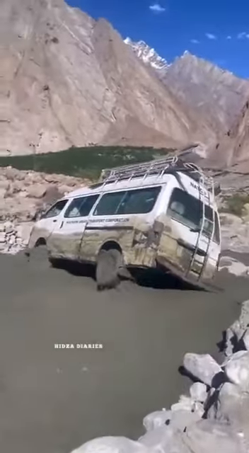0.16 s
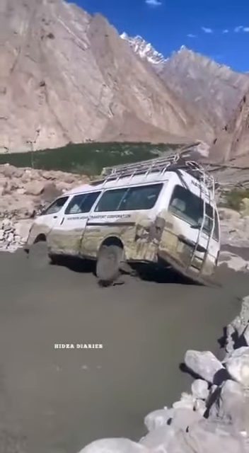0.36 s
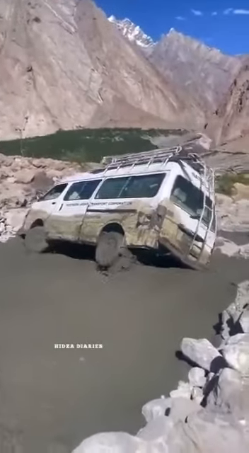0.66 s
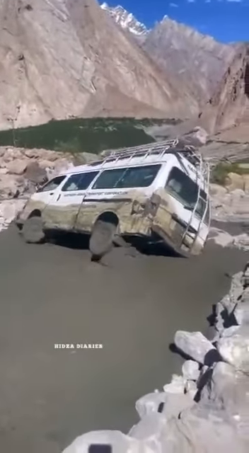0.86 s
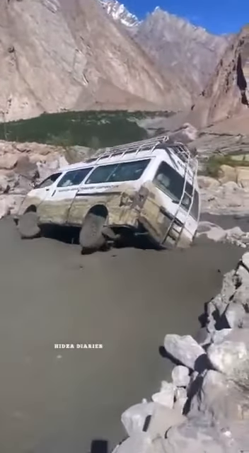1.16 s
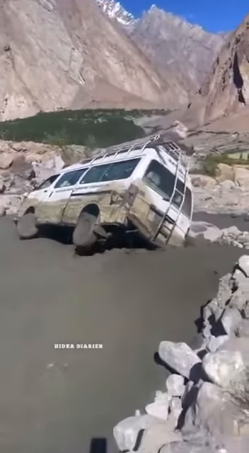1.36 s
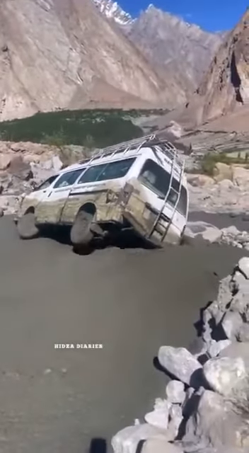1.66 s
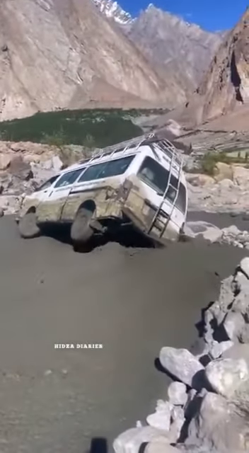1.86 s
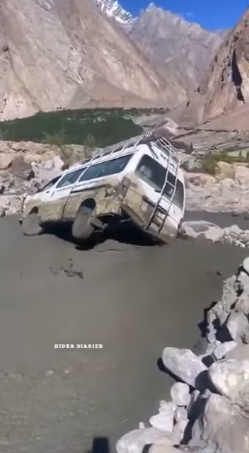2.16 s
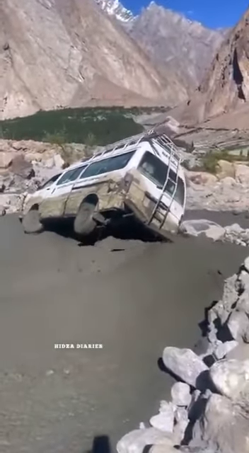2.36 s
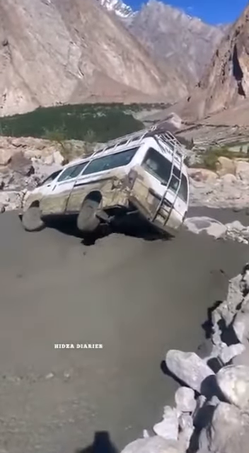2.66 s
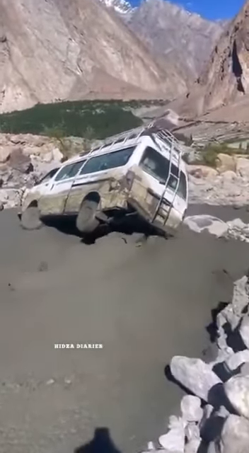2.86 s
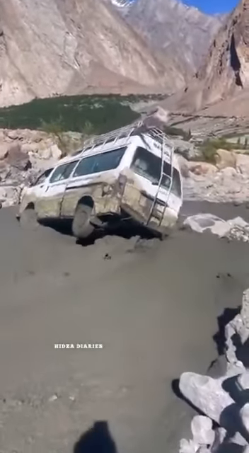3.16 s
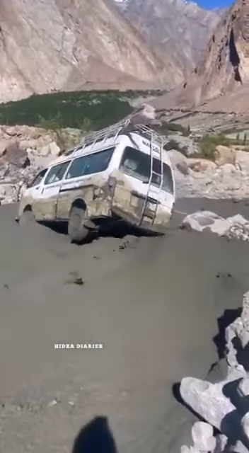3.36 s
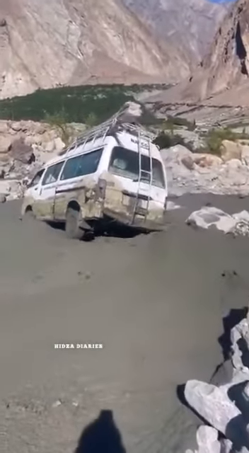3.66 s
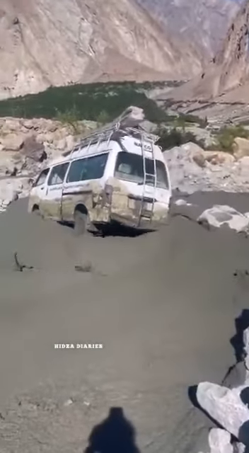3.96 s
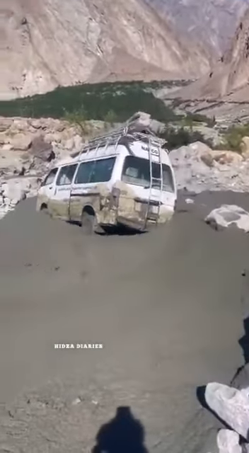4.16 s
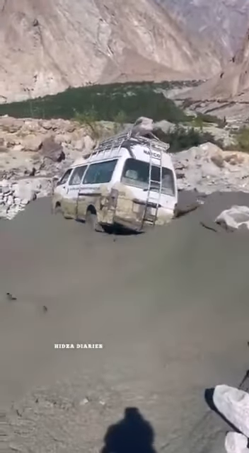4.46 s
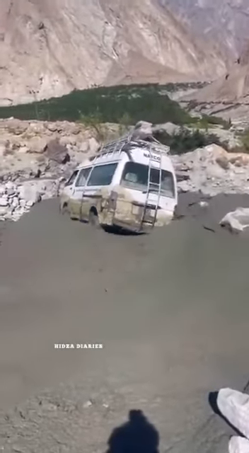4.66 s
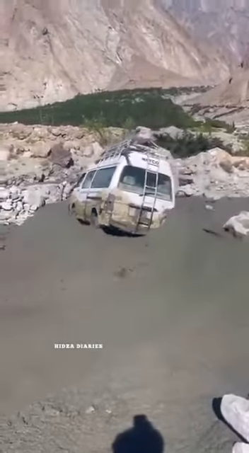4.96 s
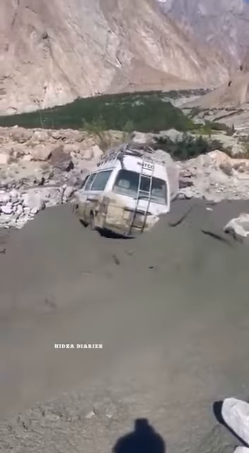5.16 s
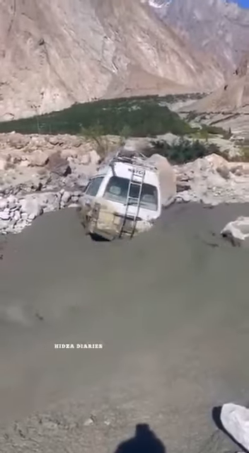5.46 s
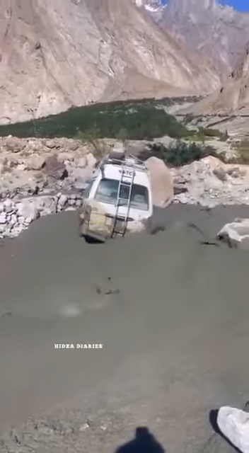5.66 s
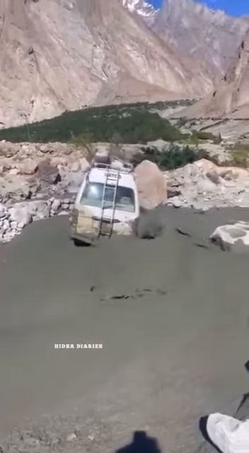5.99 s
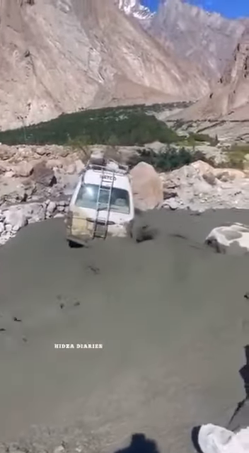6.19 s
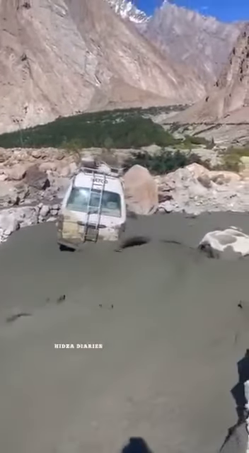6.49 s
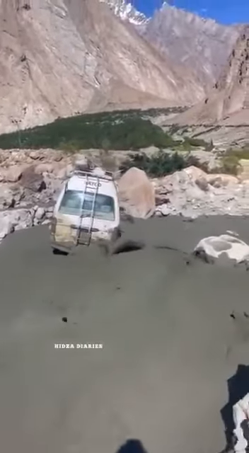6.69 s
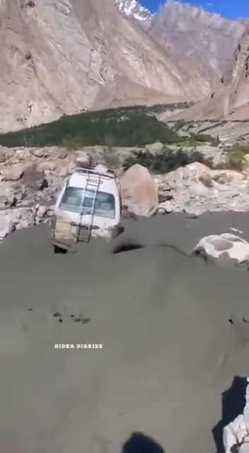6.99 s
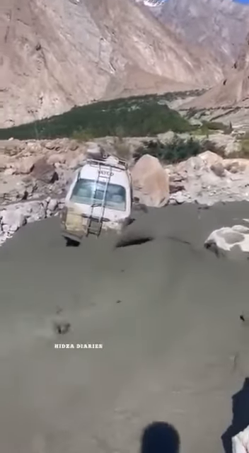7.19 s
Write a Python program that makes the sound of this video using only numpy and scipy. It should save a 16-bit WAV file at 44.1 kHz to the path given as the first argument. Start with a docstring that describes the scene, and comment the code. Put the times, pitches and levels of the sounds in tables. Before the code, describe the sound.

A thick flood of mud slides past a stony bank in an open mountain valley, heard from a handheld stereo microphone. Throughout there is a steady gritty rush, mostly midrange, with fizzing spray, small droplet rings and dull stones rolling in a hollow churn. The churn starts strong; around 0.3 seconds a sharp wet splatter comes with stone knocks and a cluster of wind thumps, and the surface hiss surges to about 0.7, then eases by 1 to 2. At 2.4 to 2.5 a dense, hard crack of gravel and stones bursts close by. A smaller splat follows near 3.4, a dull plop near 4.0. Wind flutters strongly against the microphone from 4.1 to 4.65. Soft slops fold over, clearest around 6.0 and 7.1, with a short tick near 6.55. The flow is still running, its churn slightly fuller, at about 7.3.

```python
"""A stony bank in a mountain valley: a thick mudflow slides past, heard through two microphone ports.
The mud rushes and fizzes as band-split noise with fine grit, and droplets ring as short resonances.
Rolling stones are lumpy dull noise that rings a hollow; single knocks are damped tones inside the mud.
Slops are swells of filtered noise; splatters, a load of gravel cracking down close by, and a few short
plops, bubbles and ticks are bursts. Wind buffets the ports as low noise and thuds a few cycles long."""
import sys
import numpy as np
from scipy import signal
from scipy.fft import rfft, irfft, next_fast_len
from scipy.io import wavfile
from scipy.ndimage import uniform_filter1d

SR = 44100
rng = np.random.default_rng(int(sys.argv[2]) if len(sys.argv) > 2 else 0)


def master_out(mix):
    """Clip the mix to full scale and print it as 16-bit PCM to the path in sys.argv[1]."""
    frames = np.transpose(np.atleast_2d(mix))
    ceiling = np.clip(frames, -1, 1)
    pcm = np.round(ceiling * 32767).astype(np.int16)
    wavfile.write(sys.argv[1], SR, pcm)


N = 323253

# strength of the mudflow: (time [s], surface rush level [dB], churning body level [dB])
FLOW_LEVELS = [(0.0, -41, -25.5), (0.18, -41, -31.5), (0.28, -41.5, -32.5), (0.35, -39, -28.5),
               (0.49, -36, -31), (0.67, -32.5, -31.5), (1.12, -39.5, -35.5), (2.28, -40.5, -41),
               (2.38, -42, -39.5), (2.6, -39.5, -42), (2.88, -37, -35.5), (3.29, -39, -37),
               (3.55, -38, -39.5), (3.66, -42, -39), (3.72, -37, -43), (3.92, -36, -39.5), (4.2, -39, -38),
               (4.41, -39, -35.5), (4.76, -40.5, -40), (5.35, -41, -40), (6.37, -41, -38.5),
               (6.51, -39, -34.5), (6.84, -39.5, -36.5), (7.33, -39, -33.5)]
# relative spectrum of splats and slops: (frequency [Hz], gain [dB])
SPLAT_SPECTRUM = [(410, -6.5), (700, 0), (1070, -1.5), (1630, -8), (3640, -6), (5600, -8), (7800, 1.5),
                  (9500, -6), (11500, -17), (15600, -34)]


def amp(db):
    """Decibels to gain."""
    return 10 ** (np.asarray(db) / 20)


def rms_one(x):
    """Scale to unit rms."""
    return x / np.sqrt(np.mean(x ** 2) + 1e-20)


def in_time(rows):
    """Columns of a curve table at every sample."""
    s, *columns = np.transpose(rows)
    return [np.interp(np.arange(N) / SR, s, c) for c in columns]


def at_hz(points, hz):
    """Gains of a spectrum table, read on a log-frequency axis."""
    table_hz, gain_db = np.transpose(points)
    return np.interp(np.log(hz), np.log(table_hz), gain_db)


def colour(x, spectrum):
    """Shape by a spectrum table."""
    size = next_fast_len(N)
    hz = np.linspace(1, SR / 2, size // 2 + 1)
    return irfft(rfft(x, size) * amp(at_hz(spectrum, hz)), size)[..., :N]


def drift(rate):
    """Chance flicker of spread about 1, roughly rate times a second, with its slow swells taken out."""
    step = 40   # samples between flicker points
    r = np.exp(-2 * np.pi * rate * step / SR)
    noise = rng.standard_normal(N // step + 2002)
    flicker = signal.lfilter([1], [1, -2 * r, r * r], noise)[2000:]
    flicker = flicker - uniform_filter1d(flicker, size=SR // 120)   # average over a third of a second
    return np.interp(np.arange(N) / step, np.arange(len(flicker)), rms_one(flicker))


def resonance(x, hz, width_hz):
    """Two-pole resonance, gain about 1 on top."""
    r = np.exp(-np.pi * width_hz / SR)
    poles = [1, -2 * r * np.cos(2 * np.pi * hz / SR), r * r]
    return signal.lfilter([(1 - r * r) / 2, 0, (r * r - 1) / 2], poles, x)


def grains(per_s, spread_db):
    """Two draws of clicks that share their moments and sizes but not their fine shape."""
    struck = rng.random(N) < per_s / SR
    sizes = amp(spread_db * np.minimum(rng.exponential(1, N), 4)) * struck
    envelope = signal.lfilter([1], [1, -.9], sizes)
    return rms_one(envelope * rng.standard_normal((2, N)))


def thuds(events, cycles, trim_db, overtone):
    """Each thud swells for some cycles and is damped within a few more; two draws of its phase."""
    out = np.zeros((2, N))
    for (s, level_db, hz), chance in zip(events, rng.random((len(events), 5))):
        turns = hz * np.arange(int(8 * cycles / hz * SR)) / SR
        shape = turns / cycles * np.exp(1 - turns / cycles)
        overtone_turns = (1.09 + 0.24 * chance[0]) * turns + chance[1:3, None]
        tone = np.sin(2 * np.pi * (turns + chance[3:, None]))
        tone = tone + overtone * np.sin(2 * np.pi * overtone_turns)
        i = round(s * SR)
        thud = amp(level_db + trim_db) * shape * tone
        out[:, i:i + len(turns)] += thud[:, :N - i]
    return out


def rush():
    """Gritty hiss: patches of the surface swell band by band, and a stronger flow throws finer spray."""
    # relative spectrum of the hiss: (frequency [Hz], gain [dB])
    rush_spectrum = [(500, -74), (900, -8.5), (1500, -0.5), (1800, -2.5), (2500, 0), (4000, -6.5),
                     (4600, -3.5), (4950, -13.5), (5500, -7), (6200, -8), (7700, -6.5), (9500, -15),
                     (11500, -25), (12400, -38), (14000, -29), (15700, -50)]
    swell_db = .8   # chance swells of the whole surface
    grit = grains(per_s=900, spread_db=-1)
    hiss = colour(rng.standard_normal((2, N)) + 0.36 * grit, rush_spectrum)
    together = drift(12.4)
    flow_db = in_time(FLOW_LEVELS)[0]
    surge_db = flow_db - np.mean(flow_db)
    out = 0
    edges = np.geomspace(700, 18000, 13)
    for low, high in zip(edges, edges[1:]):
        band = signal.sosfilt(signal.butter(2, [low, high], "band", fs=SR, output="sos"), hiss)
        brighten_db = 0.49 * surge_db * low / 14000   # surges lift the upper bands most
        out = out + band * amp(swell_db * together + 0.95 * drift(14) + brighten_db)
    return rms_one(out)


def droplets():
    """Drops and bursting bubbles ring for some tens of cycles at pitches spread over the middle range."""
    pitches, dealt = np.geomspace(950, 4300, 14), rng.integers(0, 14, N)
    struck = rng.random(N) < 400 * amp(3 * drift(14)) / SR
    sizes = amp(2.2 * np.minimum(rng.exponential(1, N), 4)) * struck
    clicks = sizes * rng.standard_normal((2, N)) + 1e-18
    out = 0
    for k, hz in enumerate(pitches):
        ring = resonance(clicks * (dealt == k), hz, hz / 65)
        out = out + resonance(ring, hz, hz / 4.9) / hz   # ringing twice rounds the attack
    return rms_one(out)


def churn():
    """Stones rolling in the mud: lumpy dull noise, and small blows that ring a hollow."""
    # relative spectrum of the dull noise: (frequency [Hz], gain [dB])
    body_spectrum = [(120, -83), (200, -5), (269, -1), (370, -5.5), (532, -5.5), (640, -9), (853, -5),
                     (1500, -21.5), (1950, -22), (3300, -120)]
    hollow_hz, hollow_width_hz, hollow_db = 638, 65, -7.5   # level relative to the body's mean
    hollow_follows = 0.18   # share of the body's swing in dB that reaches the hollow
    body = rms_one(colour(rng.standard_normal((2, N)), body_spectrum)) * amp(2.8 * drift(19.8))
    blows = grains(per_s=400, spread_db=1.5)
    hollow = resonance(blows, hollow_hz, 2 * hollow_width_hz)
    hollow = rms_one(resonance(hollow, hollow_hz, hollow_width_hz))
    body_db = in_time(FLOW_LEVELS)[1]
    mean_db = body_db.mean()
    ring_db = hollow_db + mean_db + hollow_follows * (body_db - mean_db)
    return amp(body_db) * body + amp(ring_db) * hollow


def wind():
    """A lumpy rumble, a throb above it, and gusts that thump the ports a few cycles at a time."""
    # strength of the wind on the ports: (time [s], rumble level [dB], throb level [dB])
    wind_levels = [(0.0, -52, -34), (0.49, -43, -26.5), (0.75, -41, -32.5), (1.26, -37, -40.5),
                   (1.73, -35, -37.5), (2.18, -44, -39.5), (3.27, -39, -34), (3.39, -38, -37),
                   (4.14, -46, -39), (4.35, -46, -34.5), (4.53, -39, -33), (4.74, -50, -34.5),
                   (5.47, -39, -41), (5.8, -38, -37.5), (6.1, -43, -39.5), (7.33, -37.5, -34)]
    # relative spectra of the two layers: (frequency [Hz], gain [dB])
    rumble_spectrum = [(11, -48), (18, -29), (65, 1.5), (141, -7), (200, -13), (260, -41), (440, -120)]
    throb_spectrum = [(53, -8), (90, -3), (183, -2.5), (350, -15.5), (460, -27.5), (770, -120)]
    # gusts buffeting the ports: (time [s], level before trim [dB], pitch [Hz])
    buffets = [(0.316, -11.5, 138), (0.337, -25, 101), (0.345, -16, 197), (0.37, -11, 152),
               (0.388, -15, 148), (0.406, -25, 94), (0.448, -33, 171), (0.462, -15, 190),
               (0.491, -21, 84.5), (0.565, -19, 138), (0.605, -30, 147), (1.366, -19, 70.5),
               (1.683, -20, 125), (1.822, -17, 187), (1.905, -20.5, 96), (2.464, -24, 149),
               (2.749, -17, 203), (3.193, -21, 186), (3.778, -22, 133), (4.129, -13, 153),
               (4.159, -15, 182), (4.178, -16.5, 127), (4.203, -10.5, 207), (4.243, -12, 207),
               (4.269, -13.5, 217), (4.359, -14.5, 207), (4.39, -18, 199), (4.484, -15, 198),
               (4.503, -12.5, 163), (4.524, -12, 140), (4.557, -13.5, 220), (4.573, -13.5, 223),
               (4.64, -14.5, 215), (5.154, -18.5, 89), (5.582, -14.5, 160), (5.615, -17, 162),
               (5.65, -23, 150), (5.733, -18.5, 155), (6.418, -26, 66), (6.448, -18.5, 215),
               (6.8, -23, 175), (7.098, -14.5, 252)]
    rumble_db, throb_db = in_time(wind_levels)
    rumble = rms_one(colour(rng.standard_normal((2, N)), rumble_spectrum))
    throb = rms_one(colour(rng.standard_normal((2, N)), throb_spectrum))
    gusts = thuds(buffets, cycles=1.19, trim_db=-6, overtone=0.17)
    lumpy_rumble = amp(rumble_db + 4.45 * drift(4.6)) * rumble
    return lumpy_rumble + amp(throb_db + 3.14 * drift(27)) * throb + gusts


def knocks():
    """Dull blows of stone on stone, damped by the mud."""
    # stones knocking under the mud: (time [s], level before trim [dB], pitch [Hz])
    stone_blows = [(0.027, -17.5, 365), (0.248, -14, 518), (0.311, -19, 455), (0.3495, -13.5, 495),
                   (0.365, -23, 467), (0.52, -15.5, 615), (0.578, -20.5, 388), (0.709, -22.5, 640),
                   (1.642, -22.5, 635), (1.665, -25, 680), (2.008, -22, 627), (2.228, -22.5, 635),
                   (2.427, -28, 603), (2.44, -18.5, 575), (2.454, -13, 656), (2.462, -13.5, 588),
                   (2.471, -15.5, 610), (2.4945, -12.5, 645), (2.501, -15, 630), (2.506, -17, 620),
                   (2.655, -22, 634), (3.482, -23.5, 630), (3.877, -25.5, 592), (4.412, -26, 640),
                   (4.462, -27, 613), (4.525, -22, 413), (4.643, -22, 490), (5.772, -18.5, 638),
                   (5.784, -24, 660), (6.8455, -21, 746), (7.145, -26.5, 623)]
    return thuds(stone_blows, cycles=1.88, trim_db=-1.5, overtone=0.3)


def slops():
    """Mud folding over, no crack: a quick swell of wash around its own centre, with a very faint broad wash."""
    # soft slops: (time of the crest [s], level [dB], centre frequency [Hz])
    slop_events = [(.09, -38, 1480), (.525, -33, 1410), (.713, -33, 1100), (.845, -37, 1800),
                   (1.04, -37, 1770), (1.175, -34.5, 1670), (1.375, -36, 1460), (1.432, -34.5, 3830),
                   (2.009, -35, 1080), (2.157, -38, 1730), (2.999, -35.5, 1800), (3.34, -39, 2060),
                   (3.49, -35, 2510), (3.886, -36.5, 1470), (4.03, -39, 1630), (4.625, -34, 1400),
                   (4.815, -39, 1320), (5.252, -36.5, 1700), (5.273, -34.5, 2030), (5.587, -35.5, 1390),
                   (5.738, -37, 1400), (5.774, -36.5, 1260), (5.95, -34, 1500), (5.995, -31.5, 1550),
                   (6.072, -32.5, 2420), (6.31, -34.5, 1460), (7.1, -31.5, 1300), (7.216, -43, 2500)]
    rise_s, fall_s, broad_db = 0.0068, 0.023, -38
    noise, out = colour(rng.standard_normal((2, N)), SPLAT_SPECTRUM), np.zeros((2, N))
    lead_in = 1500   # samples before the crest
    t = np.arange(-lead_in, 3500) / SR
    shape = np.where(t < 0, np.exp(-.5 * (t / rise_s) ** 2), np.exp(-t / fall_s))
    for s, level_db, hz in slop_events:
        i = round(s * SR) - lead_in
        wash = noise[:, i:i + len(t)]
        centred = rms_one(resonance(wash, hz, 0.45 * hz))
        out[:, i:i + len(t)] += amp(level_db) * shape * (centred + amp(broad_db) * rms_one(wash))
    return out


def splats():
    """Each splat is a crack and a longer, stuttering tail: a broad wet slap below, fine spray above."""
    # splatters, gravel cracks, and a few short plops, bubbles and ticks:
    # (time [s], level before trim [dB], centre of the wet slap [Hz],
    # fine spray relative to the slap [dB], time for the tail to fall by 60 dB [s])
    splat_events = [(0.3047, -7, 2900, -8, 0.067), (0.3074, -9, 5600, -2, 0.13),
                    (0.3284, -15, 1130, -13, 0.17), (0.5965, -14, 1570, -8, 0.18),
                    (0.96, -15, 1680, -7, 0.33), (0.995, -15, 1770, -3, 0.16),
                    (1.56, -18, 2770, -0.5, 0.072), (2.415, -18, 1530, -8, 0.1),
                    (2.4242, -14, 2700, -1.5, 0.092), (2.438, -9, 1630, 0, 0.09),
                    (2.4444, -8, 1580, -1.5, 0.075), (2.4526, -7.5, 1070, 1, 0.053),
                    (2.4615, -9, 2280, 5, 0.094), (2.4666, -17, 2400, -10, 0.24),
                    (2.4953, -16, 2500, -4, .1), (2.501, -12, 3280, -1, 0.074),
                    (2.5113, -14.5, 2400, 6, 0.062), (2.6434, -18.5, 1930, -17, 0.22),
                    (2.77, -17, 1550, -24, .2), (3.07, -21, 2000, -23, 0.24), (3.433, -20, 2300, -12, .05),
                    (3.4353, -11.5, 2560, -6, 0.11), (3.449, -18.5, 2600, -1, 0.091),
                    (3.4545, -28, 2700, -6, .1), (3.465, -22, 2590, -5, .3), (3.98, -13, 1100, -32, .03),
                    (4.22, -18, 1960, -13, 0.2), (4.301, -25, 1400, -30, .03),
                    (6.5464, -13.5, 2600, -2, .02), (6.9085, -21, 800, -25, .03)]
    rise_s = 0.0024   # a splat builds quickly
    crackle_db, crackles_per_s = 1.5, 380   # the tail stutters
    crack_t60_s, crack_db = 0.014, 0.5   # the opening crack
    grit = grains(per_s=1100, spread_db=7)
    noise = colour(rng.standard_normal((2, N)) + 0.33 * grit, SPLAT_SPECTRUM)
    dull = signal.sosfilt(signal.butter(2, 6500, fs=SR, output="sos"), noise)
    spray = rms_one(signal.sosfilt(signal.butter(4, 5000, "high", fs=SR, output="sos"), noise))
    stutter = rms_one(amp(crackle_db * drift(crackles_per_s)))
    out, t = np.zeros((2, N)), np.arange(int(.3 * SR)) / SR
    rise = np.minimum(t / rise_s, 1)
    crack = amp(crack_db - 60 * t / crack_t60_s)
    for s, level_db, hz, spray_db, t60 in splat_events:
        start = round(s * SR)
        here = slice(start, start + len(t))
        slap = rms_one(resonance(dull[:, here], hz, 0.26 * hz) + 0.5 * dull[:, here])
        tail = 0.57 * stutter[here] * amp(-60 * t / t60)
        shape = rise * (tail + crack)
        out[:, here] += amp(level_db - 8.5) * shape * (slap + amp(spray_db) * spray[:, here])
    return out


def ports(pair):
    """The right port hears the left's sound with a phase lag, mixed with sound of its own."""
    # level difference of the ports: (frequency [Hz], left minus right [dB])
    port_tilt = [(60, -.3), (250, -.8), (380, 1), (640, 5.5), (760, 0), (1000, 5), (1300, 5), (1800, 1),
                 (2500, 4), (3300, 1.5), (4500, 0), (15000, 0)]
    # bands where left and right are more alike: (from [Hz], to [Hz], share in common [0-1],
    # left's phase lead [half turns])
    alike_bands = [(0, 55, .72, 0), (75, 220, .91, 0), (340, 540, .76, .42), (590, 680, .64, .3),
                   (770, 900, .8, .95), (1550, 1950, .9, 2), (2350, 2900, .3, 2.5), (3500, 4100, .48, 4),
                   (4450, 4680, .7, 4.95), (4770, 4960, .996, 5), (5300, 6600, .97, 6),
                   (7250, 7800, .6, 6.7), (7980, 8300, .6, 8), (9000, 9550, .92, 10),
                   (10700, 11800, .5, 12), (12150, 12550, .9, 13), (12900, 14350, .975, 14)]
    least_share, widest_fade_hz = .25, 180   # share between the bands; fade at a band's edge
    size = next_fast_len(N)
    hz = np.linspace(1, SR / 2, size // 2 + 1)
    common, own = rfft(pair, size)
    low, high, share, lead = np.transpose(alike_bands)
    past_edge = np.minimum(hz[:, None] - low, high - hz[:, None])
    inside = np.clip(1 + past_edge / np.minimum(widest_fade_hz, hz[:, None] / 2), 0, 1)
    alike = np.maximum(least_share, (inside * share).max(axis=1))
    half_turns = np.interp(hz, np.ravel([low, high], "F"), np.repeat(lead, 2))
    right = alike * np.exp(-1j * np.pi * half_turns) * common + np.sqrt(1 - alike ** 2) * own
    tilt = amp(at_hz(port_tilt, hz) / 2)
    return irfft(np.array([common * tilt, right / tilt]), size)[:, :N]


def scene():
    """All sources at the two ports; short surges lift the surface and the body of the flow together."""
    surges_db = .7 * drift(8)
    surface = amp(in_time(FLOW_LEVELS)[0] + surges_db) * (rush() + amp(-9) * droplets())
    body = amp(surges_db) * churn()
    return ports(surface + body + wind() + knocks() + slops() + splats())


def record(dry):
    """The microphones miss the deepest bass and the top is cut."""
    lean = signal.sosfilt(signal.butter(2, 40, "high", fs=SR, output="sos"), dry)
    return signal.sosfilt(signal.ellip(12, .5, 80, 15725, fs=SR, output="sos"), lean)   # steep cut


dry = scene()
out = record(dry)
master_out(out)
```